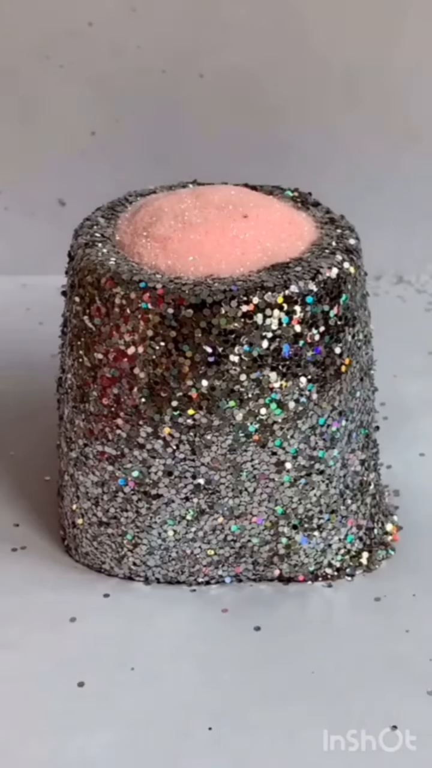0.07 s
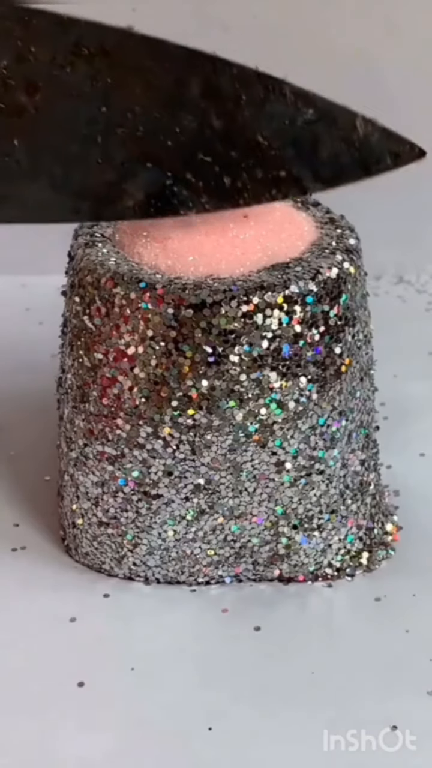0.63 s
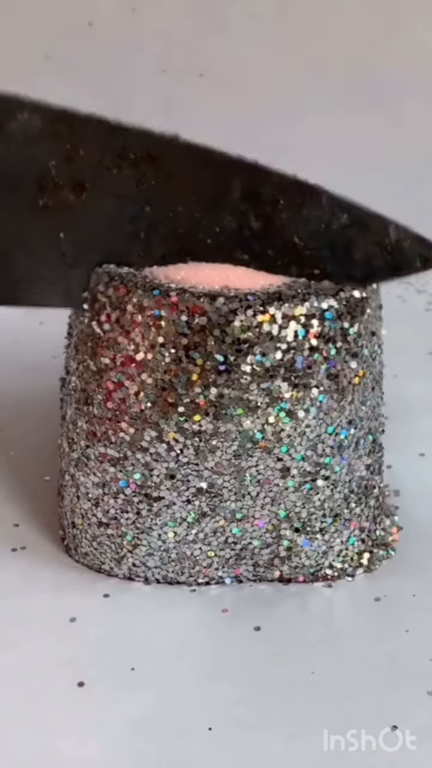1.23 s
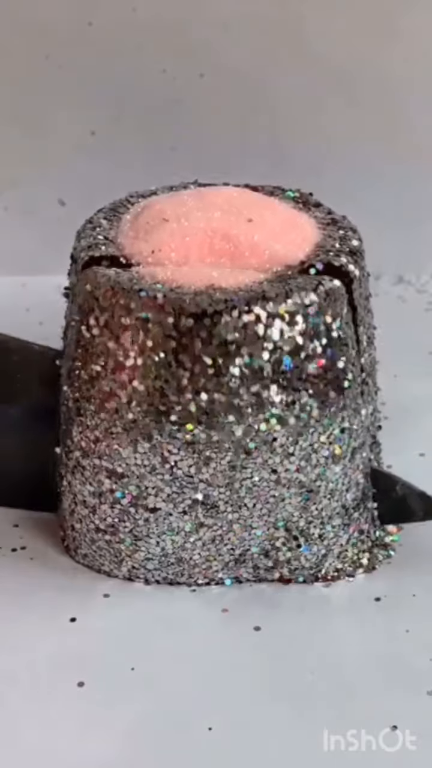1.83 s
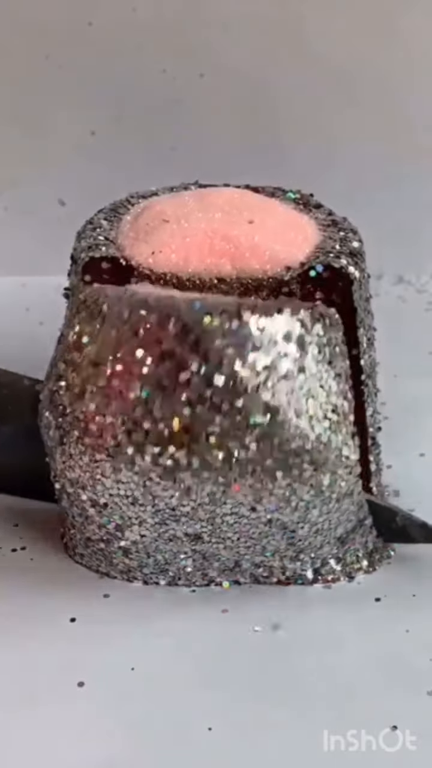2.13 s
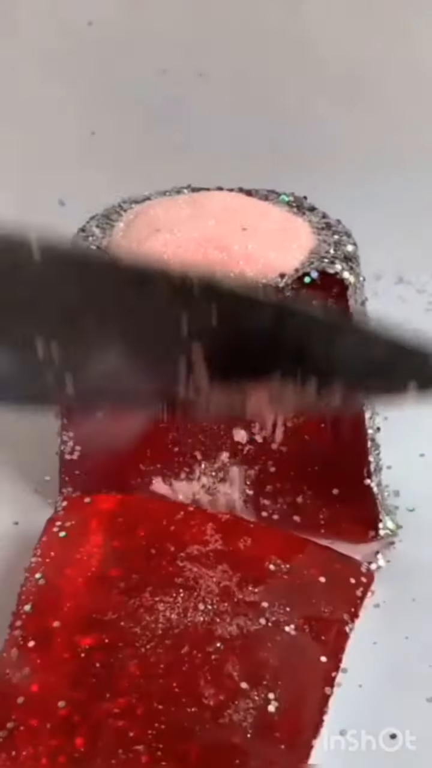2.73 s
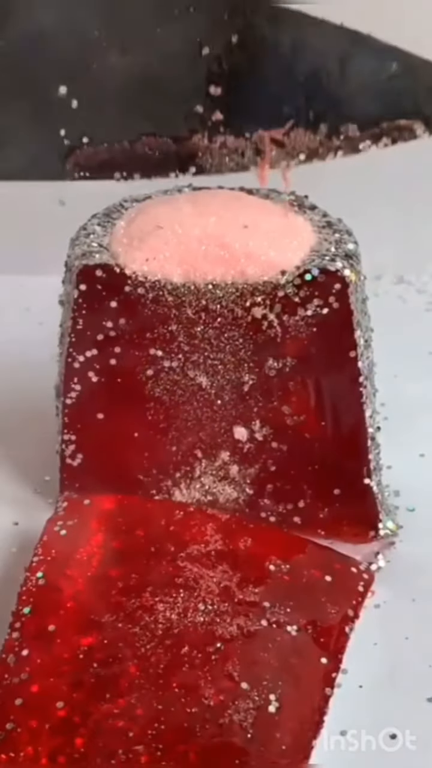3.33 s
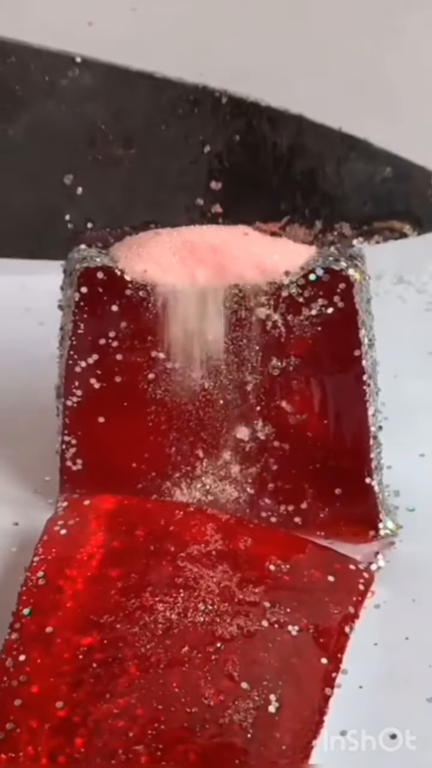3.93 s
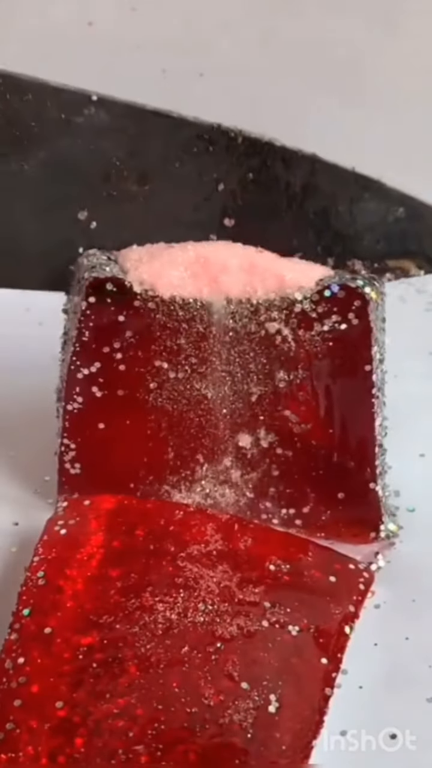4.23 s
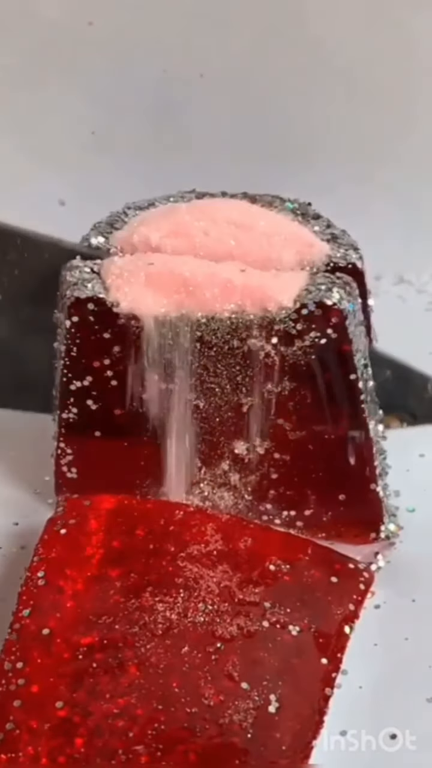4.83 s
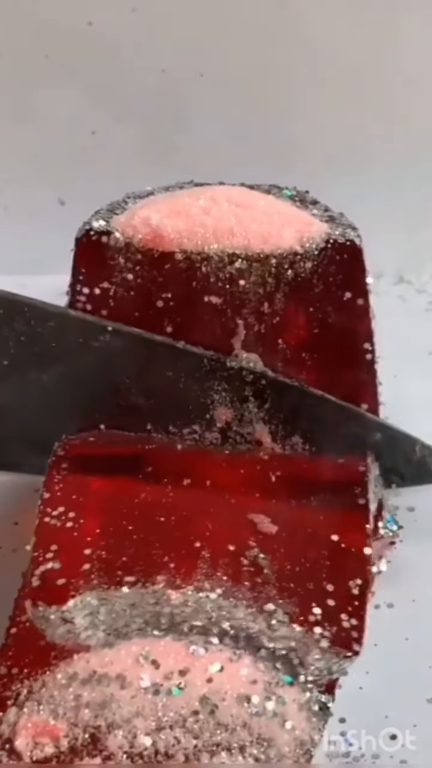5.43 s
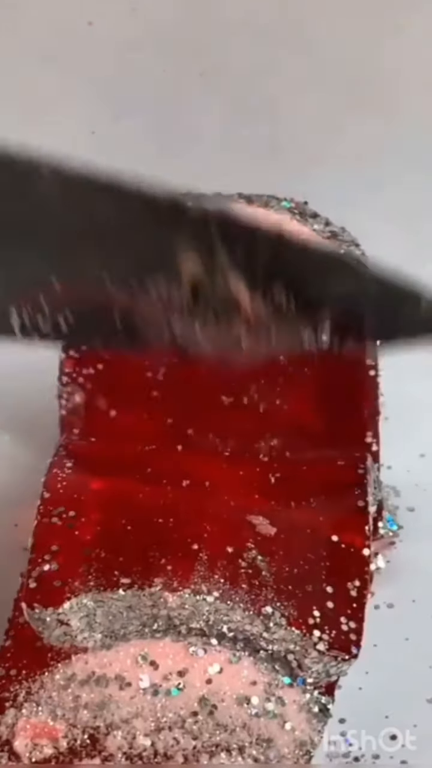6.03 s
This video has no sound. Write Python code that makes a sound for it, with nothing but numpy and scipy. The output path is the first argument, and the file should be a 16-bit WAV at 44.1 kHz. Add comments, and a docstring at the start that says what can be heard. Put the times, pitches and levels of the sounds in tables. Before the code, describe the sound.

A knife slices twice through a glitter-coated block with a close, crunchy, grainy hiss and tiny sharp ticks.

```python
"""Slicing glittery craft sand

In a quiet room, a kitchen knife slices twice through a glitter-coated block of craft sand, close by.
Countless grains snap past the blade: a crunchy hiss that gains body as the blade sinks. The block
knocks softly on the table, the opening cut whistles faintly and stiff flakes tick.
Loose grains trickle between the strokes."""
import sys
import numpy as np
from scipy import signal
from scipy.fft import rfft, irfft
from scipy.io import wavfile
from scipy.ndimage import uniform_filter1d

SR = 44100
rng = np.random.default_rng(int(sys.argv[2]) if len(sys.argv) > 2 else 0)


def wav_record(signal):
    """Record a signal, one row per channel, as 16-bit PCM in the file named by sys.argv[1]."""
    frames = np.transpose(np.atleast_2d(signal))
    bounded = np.clip(frames, -1, 1)
    # unit amplitude maps onto the largest positive 16-bit level
    quanta = np.round(bounded * 32767).astype(np.int16)
    wavfile.write(sys.argv[1], SR, quanta)


N = 268128
TIME = np.arange(N) / SR
FRAME, HOP = 1024, 256  # samples in one short frame of sound, and from one frame to the next
FRAME_HZ, WHOLE_HZ = np.fft.rfftfreq(FRAME, 1 / SR), np.fft.rfftfreq(N, 1 / SR)
TOP_HZ = 13120  # where the treble ends


def gain_of(db):
    """Turns decibels into a number to multiply by."""
    return 10 ** (np.asarray(db) / 20)


def unit_level(x):
    """Scales a signal so that its average strength (rms) is 1."""
    return x / np.sqrt(np.mean(x ** 2) + 1e-20)


def curve_at(points, hz):
    """Joins (f/Hz, level/dB) points into a curve, giving each octave equal room."""
    point_hz, db = np.transpose(points)
    return np.interp(np.log(hz + 1), np.log(point_hz + 1), db)


def bell(centre_hz, width_hz):
    """A smooth hill over frequency, half as high at the edges of its width."""
    return .5 ** ((2 * (FRAME_HZ - centre_hz) / width_hz) ** 2)


def during(t, start, end, steepness=1.6):
    """Rises from 0 at the start, holds at 1 and falls to 0 at the end."""
    return np.clip(steepness * np.sin(np.pi * np.clip((t - start) / (end - start), 0, 1)), 0, 1)


def swells(rows):
    """One smooth rise and fall in loudness for each row."""
    return sum(gain_of(db) * np.cos(np.pi * np.clip((TIME - middle) / length, -.5, .5)) ** 2
               for middle, length, db in rows)


def shaped_noise(points):
    """Noise of strength 1 whose tone follows (f/Hz, level/dB) points."""
    gain = gain_of(curve_at(points, WHOLE_HZ)) * (WHOLE_HZ < TOP_HZ)
    return unit_level(irfft(rfft(rng.standard_normal(N)) * gain, N))


def wander(rate_hz):
    """A smooth random wobble, mostly slower than the given rate."""
    gain = WHOLE_HZ / (WHOLE_HZ + 8) / (1 + (WHOLE_HZ / rate_hz) ** 2)
    return unit_level(irfft(rfft(rng.standard_normal(N)) * gain, N))


def patches(shape, frames, bins):
    """Random blotches, smoothed over time (frames) and frequency (bins)."""
    field = rng.standard_normal(shape)
    for _ in range(2):
        field = uniform_filter1d(uniform_filter1d(field, frames, 0), bins, 1)
    return unit_level(field)


# how far each frequency spreads to the sides: f/Hz, level/dB
STEREO_SPREAD = [(4100, -64), (4270, -10.5), (5500, -6.2), (11000, -5.4), (13000, -8)]

def stereo(mid, side):
    """Makes left and right: the bass stays in the middle and the treble spreads."""
    side = irfft(rfft(side) * gain_of(curve_at(STEREO_SPREAD, WHOLE_HZ)), N)
    return np.array([mid + side, mid - side])


# the tone of the quiet room: f/Hz, relative level/dB
ROOM_TONE = [(15, -5.5), (40, -6.5), (70, -8), (160, -10), (260, -16), (400, -16.5), (510, -17.5),
             (850, -22.5), (1200, -27), (2400, -33), (2950, -30), (3400, -33), (6000, -37.5),
             (13000, -36.5)]

def room(level_db=-64, waver_db=0.97):
    """The room rumbles softly and a little unevenly, with a trace of hiss."""
    mid, side = shaped_noise(ROOM_TONE), shaped_noise(ROOM_TONE)
    return gain_of(level_db + waver_db * wander(11)) * stereo(mid, side)


# the tones that hum in the room: f/Hz, level/dB
HUM_TONES = [(46, -73), (120, -77), (162, -76)]

def hum():
    """Faint low tones waver slightly in pitch."""
    return sum(gain_of(db) * np.sqrt(2) * np.sin(2 * np.pi * hz * TIME + wander(3.2))
               for hz, db in HUM_TONES)


# the hand shifts its weight: middle t/s, length/s, relative level/dB
HAND_SHIFTS = [(1.55, 0.94, -63.5), (2.37, 0.098, -58), (2.73, 0.11, -58), (3.10, 0.12, -61),
               (4.35, 0.2, -65), (5.05, 0.55, -66.5)]

def table_bumps(gain_db=-1):
    """The table answers the leaning hand with a dull rumble."""
    rumble = shaped_noise([(15, -17), (40, -1.5), (80, -4.5), (160, -34), (600, -60)])
    return gain_of(gain_db) * swells(HAND_SHIFTS) * rumble


# pinches of loose sand slide off: middle t/s, length/s, relative level/dB
SAND_SPILLS = [(2.92, 0.053, -66), (3.10, 0.093, -55), (3.23, 0.065, -57), (3.35, .04, -59),
               (3.51, 0.066, -55), (3.65, .04, -57), (3.78, 0.072, -61), (3.965, 0.05, -53),
               (4.02, 0.038, -58)]

def spills(gain_db=-1.5, centre_hz=5850, grains_per_s=2500):
    """Sliding sand rustles in a soft treble band, grain upon grain."""
    band = signal.iirpeak(centre_hz, Q=2.3, fs=SR)
    clicks = rng.standard_normal((2, N)) * (rng.random(N) < grains_per_s / SR)
    sliding = unit_level(clicks) + 0.63 * rng.standard_normal((2, N))
    rustle = signal.lfilter(*band, signal.lfilter(*band, sliding))
    mid, side = gain_of(gain_db) * swells(SAND_SPILLS) * unit_level(rustle)
    return stereo(mid, side)


# small jerks of the block: t/s, relative peak level/dB
BLOCK_JERKS = [(1.245, -52), (1.581, -54), (1.662, -50.5), (1.744, -48), (1.933, -50), (2.092, -49),
               (2.16, -51.5), (2.238, -50), (2.273, -49), (2.517, -50), (4.801, -47.5), (4.862, -55.5),
               (4.949, -50.5), (5.136, -50), (5.32, -51), (5.353, -48), (5.384, -51.5), (5.641, -52),
               (5.677, -52.5)]

def knocks(gain_db=-2, pitch_hz=546.4, detune=0.047, rise_s=0.0042, decay_s=0.015):
    """The block gives way in small jerks; each one knocks softly on the table."""
    t = np.arange(4096) / SR
    envelope = (1 - np.exp(-t / rise_s)) * np.exp(-t / decay_s)
    envelope /= envelope.max()
    out = np.zeros(N)
    for start, peak_db in BLOCK_JERKS:
        hz = pitch_hz * (1 + detune * rng.standard_normal())
        knock = envelope * np.sin(2 * np.pi * hz * t)
        out[round(start * SR):][:len(t)] += gain_of(peak_db + gain_db) * knock
    return out


# single flakes snap: t/s, relative peak level/dB
FLAKE_SNAPS = [(1.7184, -32), (1.8064, -21), (1.8824, -30), (2.0024, -24), (2.3164, -25), (2.3533, -22.5),
               (2.4754, -23), (2.7894, -33), (2.8354, -35), (3.8974, -43), (4.0896, -25), (4.2004, -26),
               (4.8964, -23), (5.2444, -25), (5.3604, -28), (5.8381, -24), (5.857, -19), (5.9084, -23.5),
               (5.92, -24.5)]

def snaps(gain_db=-5, decay_s=0.00052):
    """A stiff flake lets go with a very short, bright tick."""
    t = np.arange(256) / SR
    treble = signal.butter(2, [6500, 12900], "bandpass", fs=SR)
    out = np.zeros(N)
    for start, peak_db in FLAKE_SNAPS:
        burst = rng.standard_normal(len(t)) * np.exp(-t / decay_s)
        tick = signal.lfilter(*treble, burst)
        out[round(start * SR):][:len(t)] += gain_of(peak_db + gain_db) * tick / abs(tick).max()
    return out


# the two knife strokes, one list each: t/s, hiss level/dB, crunch level/dB (both relative)
KNIFE_STROKES = [
    [(0.9, -67.5, -78), (0.965, -50, -70), (1.03, -48.5, -59.5), (1.08, -44.5, -59), (1.18, -44, -57),
     (1.41, -39, -53), (1.51, -40, -50.5), (1.588, -38, -50.5), (1.702, -37, -50), (1.898, -34.5, -46.5),
     (2.268, -38.5, -47), (2.32, -35, -48.5), (2.5, -37, -51), (2.66, -37.5, -51.5), (2.73, -44.5, -56.5),
     (2.85, -48.5, -59.5)],
    [(4.065, -50.5, -60), (4.09, -49.5, -61), (4.14, -46, -57.5), (4.36, -40.5, -51.5), (4.53, -38.5, -52),
     (4.68, -39, -51.5), (4.88, -36.5, -47.5), (5.04, -33.5, -48), (5.19, -36, -48), (5.3, -40, -50),
     (5.37, -38, -49.5), (5.5, -39.5, -50.5), (5.56, -38.5, -50), (5.82, -37.5, -50), (5.842, -34, -51.5),
     (5.89, -33, -50), (5.92, -34, -54.5), (5.95, -36, -52), (6.03, -48.5, -55), (6.08, -51, -59.5)],
]

def stroke_levels(t, touch_db_per_s=400, settle_s=0.26):
    """Hiss and crunch in dB: they swell as the blade touches and sink to a trickle between strokes."""
    first, second = (np.array(stroke) for stroke in KNIFE_STROKES)
    times, hiss_db, crunch_db = np.vstack([first, second]).T
    pause = (t > first[-1, 0]) & (t < second[0, 0])
    approach_db = np.clip(touch_db_per_s * (times[0] - t), 0, 45)
    loose = np.exp(-np.maximum(t - first[-1, 0], 0) / settle_s)

    def level(stroke_db, fresh_db, settled_db):
        trickle_db = settled_db + (fresh_db - settled_db) * loose
        return np.where(pause, trickle_db, np.interp(t, times, stroke_db) - approach_db)

    return level(hiss_db, fresh_db=-49.5, settled_db=-55), level(crunch_db, fresh_db=-59, settled_db=-65)


# whistles of the slit, and in the third row a focused crunch of the second cut: start t/s, end t/s, first f/Hz,
# open f/Hz, width/Hz, boost/dB
GLIDING_BANDS = [(1.752, 2.284, 4440, 3530, 740, 9), (4.868, 5.118, 6300, 6000, 900, 1.5),
                 (4.952, 5.096, 4900, 4500, 1700, 3), (5.905, 5.975, 6360, 5950, 1000, 7)]

def gliding_bands(t, fall_share=0.15):
    """Boost in dB: the slit behind the blade whistles, falling in pitch as it opens; one broad band is a
    focused crunch of the second cut, gliding down the same way."""
    db = 0
    for start, end, first_hz, open_hz, width_hz, boost_db in GLIDING_BANDS:
        narrowness = np.exp(-np.maximum(t - start, 0) / (fall_share * (end - start)))
        hz = open_hz + (first_hz - open_hz) * narrowness
        flat_topped_band = np.minimum(1.26 * bell(hz, width_hz), 1)
        db += boost_db * during(t, start, end) * flat_topped_band
    return db


# scrapes: start t/s, end t/s, lower f/Hz, upper f/Hz, width/Hz, typical boost/dB
BLADE_SCRAPES = [(2.294, 2.76, 3800, 4100, 220, 1.5), (2.297, 2.77, 4920, 6830, 460, 5.5),
                 (2.3, 2.74, 5540, 8870, 300, 5.5), (5.2, 5.84, 4180, 6640, 480, 4)]

def blade_scrapes(t, shift_hz=13):
    """Boost in dB: the blade rings at the bottom of the cut, wavering as its grip shifts."""
    db = 0
    for start, end, *pair_hz, width_hz, boost_db in BLADE_SCRAPES:
        sway, flutter = (np.interp(t, TIME, wander(shift_hz)) for _ in range(2))
        rings = sum(bell(hz * (1 + 0.005 * sway), width_hz) for hz in pair_hz)
        db += boost_db * (1 + 0.29 * flutter) * during(t, start, end) * rings
    return db


# the blade drags free: start t/s, end t/s, boost/dB
BLADE_PULLS = [(2.71, 3.05, 4), (5.827, 5.93, 7.5)]

def glitter(t, flicker_db=1.7):
    """Treble change in dB: glitter breaks off in flickering clumps, brighter as the blade drags free."""
    pull_db = sum(boost_db * during(t, start, end) for start, end, boost_db in BLADE_PULLS)
    clumps = patches((len(t), len(FRAME_HZ)), frames=5, bins=50)
    return (pull_db + flicker_db * clumps) * bell(11700, width_hz=5300)


# cuts: blade in t/s, blade out t/s, hollow at full depth f/Hz, block's ring f/Hz, ring boost/dB
BLADE_CUTS = [(0.962, 2.81, 2823, 1220, 2.5), (4.113, 6.032, 3020, 2560, 1.5)]

def sinking_blade(t, lightness_db, top_hz=3870, sink_s=0.46, bite_s=0.99):
    """Tone change in dB: the block rings; the blade's face cancels a band that falls as it sinks."""
    db = 0
    for start, end, deep_hz, ring_hz, ring_db in BLADE_CUTS:
        hollow_hz = deep_hz + (top_hz - deep_hz) * np.exp(-((t - start) / sink_s) ** 2)
        hollows_db = -9 * bell(hollow_hz, width_hz=98) - 3.5 * bell(2.41 * hollow_hz, width_hz=370)
        db += hollows_db * during(t, start, end, steepness=17)
        low_ring = during(t, start, end, steepness=1) ** 4 * bell(0.32 * ring_hz, width_hz=280)
        db += ring_db * (bell(ring_hz, width_hz=360) + low_ring) * during(t, start, end)
        # until the blade has bitten in, it rasps less
        db -= 0.27 * lightness_db * during(t, start - bite_s, start + bite_s) * bell(3680, width_hz=790)
    return db


# the tone of sand being cut: f/Hz, relative level/dB
SAND_TONE = [(100, -15), (220, -10.5), (400, -13.5), (700, -9.5), (950, -11), (1200, -5.5), (2600, -5),
             (3400, -4.5), (5000, -2), (6500, -0.5), (8400, -3), (10300, 1), (12800, 1)]
# where block, blade and table ring: f/Hz, width/Hz, boost/dB
BODY_RINGS = [(291.6, 29, 6.5), (531, 136, 8), (786, 89, 2), (1064, 50, 1.5), (1350, 42, 7),
              (1880, 170, 1.5), (2280, 140, 2), (2890, 160, 4), (3560, 36, 6), (3690, 43, 6),
              (4110, 106, 4.5), (6120, 45, -0.5), (9800, 220, 1), (10400, 70, -1), (11400, 130, 2.5)]

def cutting_tone(t, ring_db=2.5, blotch_db=0.5):
    """The tone of the cut in dB, over time and frequency: sand, block and blade all shape it."""
    _, crunch_db = stroke_levels(t)
    lightness_db = np.minimum(crunch_db.max() - crunch_db, 20)
    body_db = sum(boost_db * bell(hz, width_hz) for hz, width_hz, boost_db in BODY_RINGS)
    murmur_db = (0.58 * lightness_db - 3) * bell(654, width_hz=540)  # a light touch sounds duller
    db = curve_at(SAND_TONE, FRAME_HZ) + body_db + murmur_db
    db += sinking_blade(t, lightness_db) + gliding_bands(t) + blade_scrapes(t)
    # contacts keep changing, so narrow rings and broad blotches come and go above the bass
    rings = ring_db * patches(db.shape, frames=11, bins=3)
    blotches = blotch_db * patches(db.shape, frames=9, bins=16)
    db += (rings + blotches) * FRAME_HZ / (FRAME_HZ + 900)
    return db + glitter(t)


def grains(level_db, peak_per_s, spread_db, clump_db):
    """Breaking grains click in clumps over a hiss (mid and side); a faster cut breaks more of them."""
    per_s = peak_per_s * gain_of(.6 * (level_db - level_db.max()))
    chance = np.clip(per_s / SR, 1e-4, 1)
    size = gain_of(spread_db * np.minimum(rng.exponential(1, N), 3.3))
    sign = rng.choice([-1, 1], N)
    breaks = rng.random(N) < chance
    clicks = unit_level(size * sign * breaks / np.sqrt(chance))
    pan = unit_level(rng.uniform(-1, 1, N))
    mid_side = np.array([clicks, clicks * pan]) + rng.standard_normal((2, N))
    return unit_level(mid_side * gain_of(clump_db * wander(17)))


def through_sand(mid_side, tone_db, low_hz, high_hz):
    """Gives one band of the grains' sound the changing tone of the cut, at an even level."""
    _, _, spectra = signal.stft(mid_side, SR, nperseg=FRAME, noverlap=FRAME - HOP)
    gain = gain_of(tone_db[:spectra.shape[2]]) * (FRAME_HZ >= low_hz) * (FRAME_HZ < high_hz)
    gain /= np.linalg.norm(gain, axis=1, keepdims=True)
    _, shaped = signal.istft(spectra * gain.T, SR, nperseg=FRAME, noverlap=FRAME - HOP)
    return shaped[:, :N] / np.std(shaped[0, :N])


def cutting(split_hz=3100, hiss_gain_db=0.51, crunch_gain_db=0.3):
    """Fine grains hiss along the steel; coarser crumbs crunch in the block."""
    hiss_db, crunch_db = stroke_levels(TIME)
    frame_times = np.arange(N // HOP + 3)[:, None] * HOP / SR
    tone_db = cutting_tone(frame_times)
    fine = grains(hiss_db, peak_per_s=11000, spread_db=0, clump_db=0.83)
    coarse = grains(crunch_db, peak_per_s=4500, spread_db=1.5, clump_db=0.5)
    hiss = through_sand(fine, tone_db, low_hz=split_hz, high_hz=TOP_HZ)
    crunch = through_sand(coarse + 0.51 * fine, tone_db, low_hz=90, high_hz=split_hz)
    mid, side = gain_of(hiss_db + hiss_gain_db) * hiss + gain_of(crunch_db + crunch_gain_db) * crunch
    return stereo(mid, side)


def scene():
    """The knife at work in a quiet room."""
    return cutting() + spills() + snaps() + knocks() + table_bumps() + room() + hum()


def record(dry):
    """Takes away the very highest treble."""
    low_pass = signal.firwin(1023, TOP_HZ, window=("kaiser", 9), fs=SR)
    return signal.oaconvolve(dry, low_pass[None], "same", axes=1)


dry = scene()
out = record(dry)
wav_record(out)
```